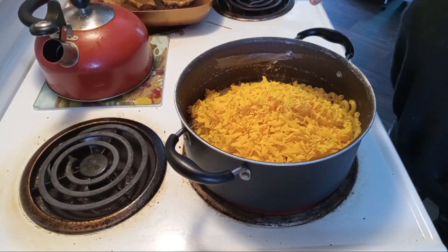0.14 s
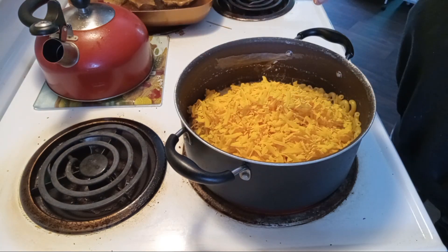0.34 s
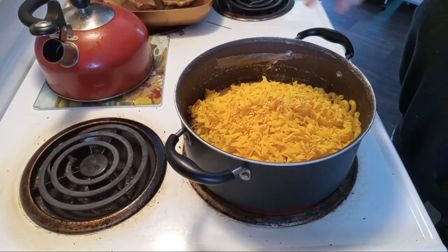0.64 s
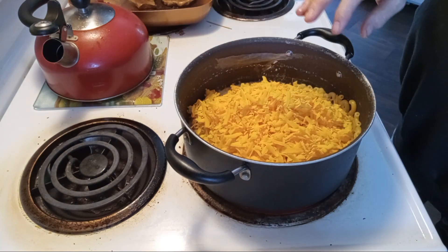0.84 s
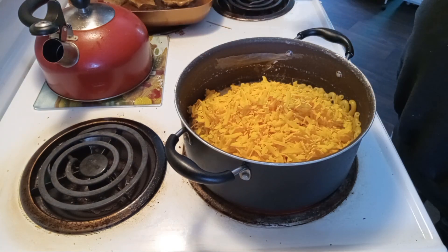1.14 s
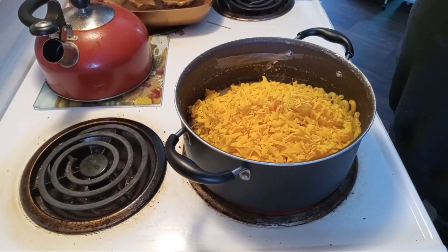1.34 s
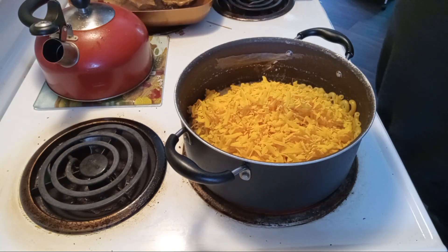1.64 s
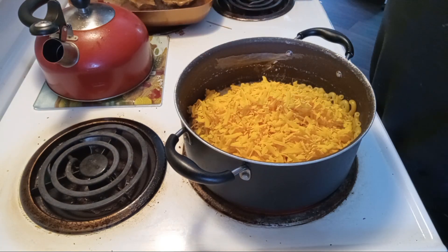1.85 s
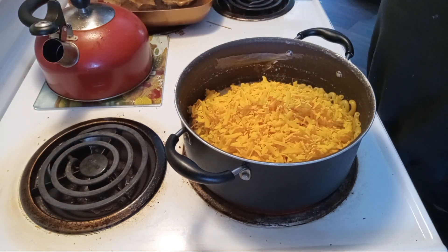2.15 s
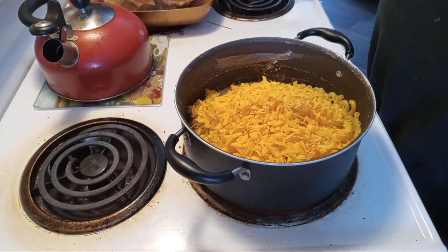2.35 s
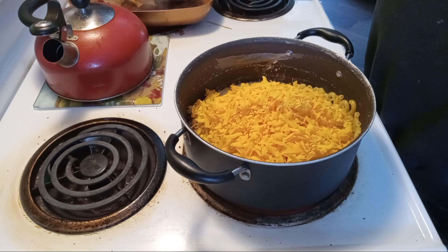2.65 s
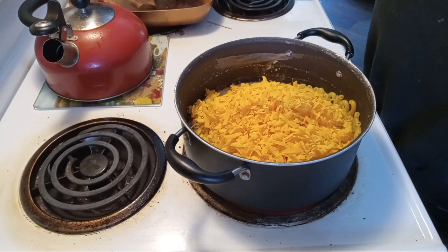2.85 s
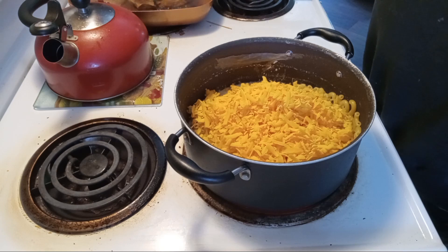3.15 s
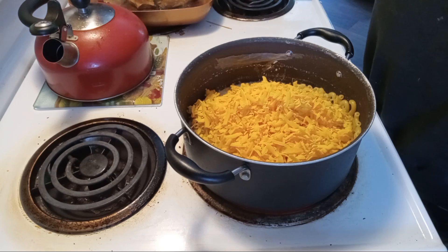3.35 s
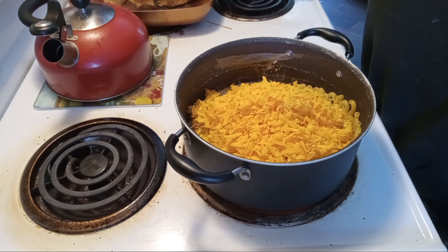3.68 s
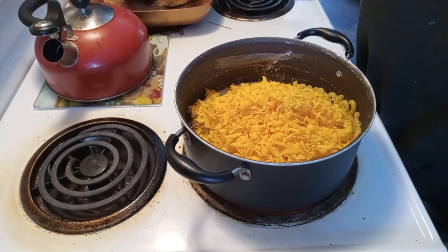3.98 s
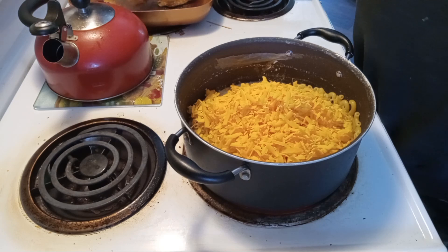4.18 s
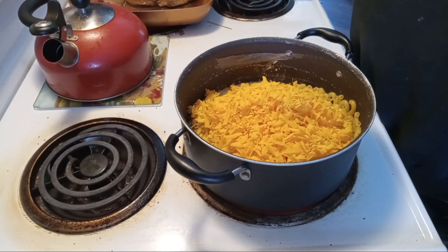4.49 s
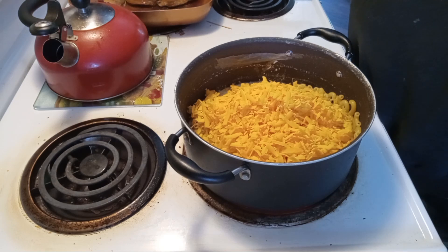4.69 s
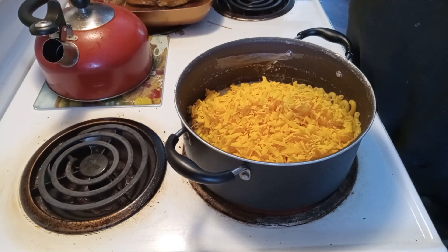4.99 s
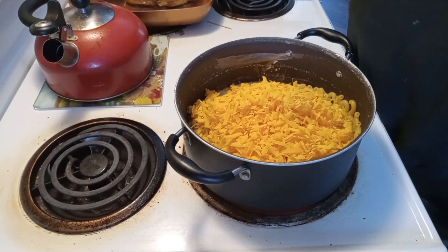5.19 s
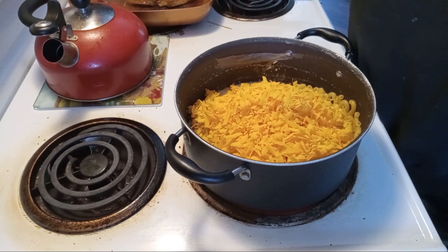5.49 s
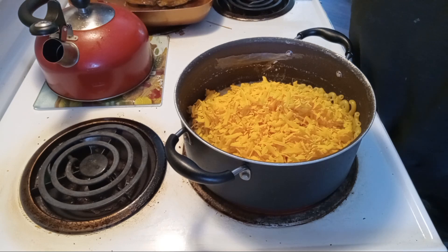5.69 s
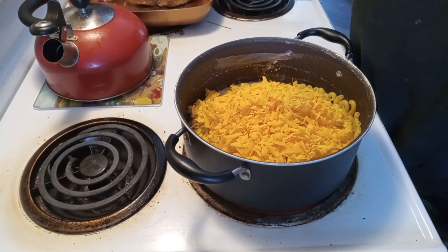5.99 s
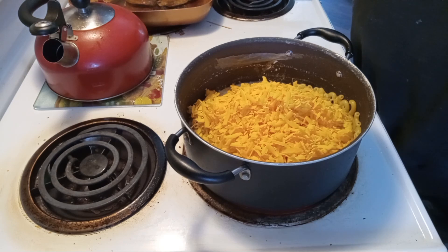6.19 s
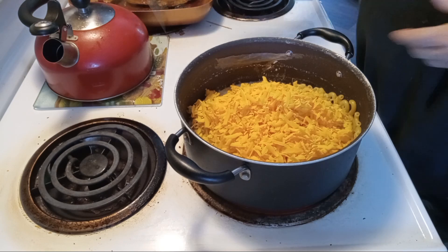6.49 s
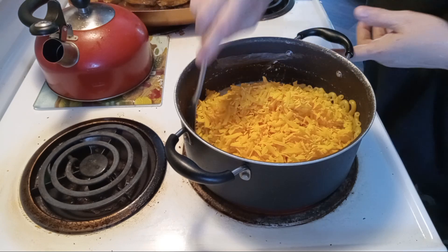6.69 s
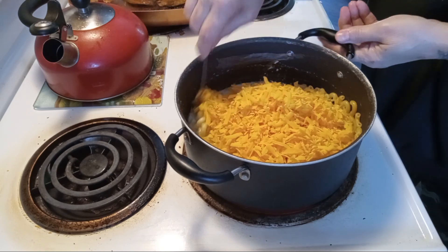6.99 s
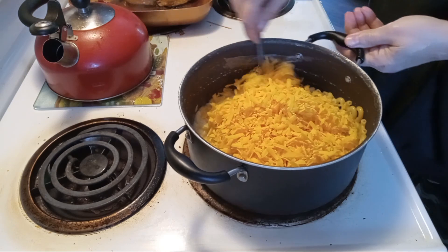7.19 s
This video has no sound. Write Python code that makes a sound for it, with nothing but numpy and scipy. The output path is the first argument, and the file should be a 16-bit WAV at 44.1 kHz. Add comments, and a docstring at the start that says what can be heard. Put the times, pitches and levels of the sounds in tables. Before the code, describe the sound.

Close steady pot sizzle with tiny steam chirps, an opening sharp dish knock, cutlery drawer clacks, soft footsteps, then a fork tapping and stirring.

```python
"""Noodles sizzling on an electric stove

In a quiet kitchen a pot boils off its last water on the hot base: random bubble bursts and steam noise grow finer.
Struck modes and room noise set down a dish; a duller knock follows. Noise bursts through resonances clack a drawer
open and shut. Swelling low modes make soft steps that return; a fork touches the pot and stirs.
One close microphone, the same in both channels, with a gain control that ducks the hiss under the knocks."""
import sys
import numpy as np
from scipy import signal
from scipy.fft import rfft, irfft
from scipy.io import wavfile
from scipy.ndimage import uniform_filter1d

SR = 44100
rng = np.random.default_rng(int(sys.argv[2]) if len(sys.argv) > 2 else 0)


def bounce(signal):
    """Save signal as a 16-bit WAV file at the path given by the first command-line argument."""
    frames = np.transpose(np.atleast_2d(signal))
    limited = np.clip(frames, -1, 1)
    pcm = np.round(limited * 32767).astype(np.int16)
    wavfile.write(sys.argv[1], SR, pcm)


N = 323436
TIME = np.arange(N) / SR  # s
FREQS = np.maximum(np.arange(N // 2 + 1) * SR / N, 1)  # Hz

# All levels are relative, ahead of the microphone's gain control.
# colour of the coarse fizz, before the pot's resonances: (frequency [Hz], density [dB per Hz])
FIZZ = [(400, -22.5), (1000, -12), (2200, -4), (2900, 3.5), (4100, 8), (6000, 5), (8500, -40), (9500, -29),
        (13500, -44), (15000, -31), (16000, -21)]
# colour of the fine hiss, before the pot's resonances: (frequency [Hz], density [dB per Hz])
HISS = [(1200, -24), (2200, -13.5), (3000, -22.5), (4100, -18), (4900, -4), (6100, 0), (7100, 0.5),
        (8600, -3), (9200, -11.5), (9800, -20), (11200, -27), (13900, -35.5), (14400, -22), (15400, -21.5)]
# resonances of the pot that colour the sizzle: (frequency [Hz], width [Hz], lift [dB])
POT = [(1600, 180, 3), (2420, 90, 3), (2740, 80, 3), (2950, 90, 3), (4630, 170, 3), (5055, 90, 3),
       (5674, 110, 3), (5968, 70, 3), (6257, 70, 3), (8356, 150, 3)]
# the pot's strongest resonances, sung as steam stirs them: (frequency [Hz], width [Hz], level [dB])
SINGING = [(4630, 90, -6), (5674, 70, -4), (5968, 40, 1), (6257, 40, -2)]
# spurts of steam flutter in these, strongest on the wet base: (frequency [Hz], width [Hz], level [dB])
SPURTS = [(3020, 70, -6), (4150, 70, -4), (4610, 100, 2.5), (5053, 70, -5), (6000, 120, -1)]
# the base boils dry along one S-curve: its midpoint and time constant (s)
DRYING_MID_S, DRYING_TAKES_S = 3.4, 0.84
# as it dries, the coarse fizz gives way to the fine hiss (dB)
FIZZ_WET_DB, FIZZ_DRY_DB = -46.5, -54
HISS_WET_DB, HISS_DRY_DB = -47, -42
# the clearest steam whistles: (time [s], level [dB], pitch [Hz])
WHISTLES = [(1.92, -50.5, 4163), (2.24, -52, 2935), (2.31, -52, 3020), (2.37, -51, 3050),
            (3.389, -56, 1608), (3.88, -54, 2200), (3.895, -54, 2650), (4.146, -58.5, 1266),
            (4.265, -52, 2680), (4.435, -52, 3520), (4.845, -52.5, 2950), (5.615, -55, 2410),
            (5.695, -54, 3030), (5.845, -55, 1810), (6.235, -56, 1920), (7.135, -54, 2190),
            (7.154, -55, 2730), (7.18, -53, 3000), (7.225, -54.5, 1800)]
# narrow gaps sing louder: gain of the highest faint whistle over the lowest (dB)
WHISTLE_RISE_DB = 11
# how unevenly a whistle sounds (dB)
WHISTLE_SPUTTER_DB = 3
# kitchen background: (frequency [Hz], density [dB per Hz])
ROOM = [(20, -11), (50, 4), (110, 0.5), (300, 1.5), (550, 0), (1000, 6.5), (1700, 1), (2500, -7),
        (5000, -4), (16000, -53)]
# feet shuffle and scuff: (time of peak [s], level [dB], length [s], pitch [Hz])
SHUFFLE = [(2.2, -72, 0.74, 128), (3.51, -64, 0.25, 124), (5.927, -57.5, 0.071, 760),
           (7.05, -72.5, 0.9, 116)]

# dish set down, with one rebound: (time [s], level [dB], contact cut-off [Hz], extra room level [dB])
KNOCKS = [(.078, -3, 7700, 6.5), (0.102, -14, 5900, 7)]
# the counter rings on under every knock: (frequency [Hz], level [dB], t60 [s])
COUNTER_RING = [(252.7, -30, 0.57), (280, -29, 0.5), (440.6, -35.5, 0.54), (740, -30, 0.51),
                (774, -32.5, 0.61), (825, -38, 0.61)]
# dead thud of dish and counter: (frequency [Hz], level [dB], t60 [s])
COUNTER = [(520, 10, 0.0039), (650, 10.5, 0.016), (925, -29, 0.013), (2000, -5, 0.0085),
           (3610, -6.5, 0.024), (6630, -2, 0.013)]
# ring of the dish: (frequency [Hz], level [dB], t60 before damping [s])
DISH = [(496, -14, .3), (577, -8, .27), (626, -6, .24), (676, -1, .22), (700, -8, .34), (931, 1.5, .42),
        (945, -7, .4), (1112, -7, .24), (1157, -9, .28), (1366, -12.5, .6), (1381, -19, .4),
        (1653, -13, .28), (1695, -2.5, .34), (1782, -5, .3), (1857, -9, .27), (2137, -4.5, .27),
        (2160, -12, .25), (2433, -20, .24), (2770, -18, .25), (2860, -19, .25), (2966, -21, .3),
        (3560, -19, .33), (3591, -17, .33), (3630, -19, .3), (3720, -17, .3), (3850, -20, .3),
        (3887, -17, .3)]
# colour of the room's answer to a knock: (frequency [Hz], density [dB per Hz])
KNOCK_ROOM = [(50, -31), (150, -6.5), (260, 3.5), (400, -3), (650, 1), (1000, -7.5), (1400, -6),
              (1800, 1.5), (2350, -13), (2800, -0.5), (3800, 9), (7000, 8), (10000, -13), (16000, -47)]
# how long that answer lasts: (frequency [Hz], t60 [s])
ROOM_T60 = [(100, 0.58), (270, 0.52), (600, 0.36), (1500, 0.47), (4000, 0.054), (12000, 0.041)]
# small sharp ticks: (time [s], level [dB], pitch [Hz])
TICKS = [(0.3522, -26, 3900), (0.3573, -17, 7500), (0.3797, -25, 6440)]
# a duller, hollow knock on the counter: (time [s], level [dB], t60 [s], contact cut-off [Hz])
HOLLOW_KNOCK = [(.4528, -20.5, 0.082, 2000), (0.484, -24.5, 0.22, 338), (0.496, -34, 0.16, 750)]
# what it rings with: (frequency [Hz], width [Hz], level [dB])
HOLLOW_MODES = [(143, 52, -9), (225, 13.6, -1.5), (300, 29, 1.5), (422, 32, -1), (480, 70, -3.5),
                (677, 60, 10), (844, 30, -2), (923, 25, 6), (1157, 26, 0.5), (1432, 28, -3),
                (1690, 34, 1.5), (1800, 26, 3)]
# how fast the rattle after a clack flutters
RATTLES_PER_S = 343
# loose cutlery clinks in the drawer and on the pot: (time [s], level [dB], pitch [Hz], t60 [s])
CLINKS = [(1.205, -54, 1336, .25), (2.185, -52, 1924, .18), (2.205, -46, 2600, .16),
          (2.212, -56, 1354, 0.42), (2.214, -56, 950, 0.2), (2.272, -54, 1364, 0.63),
          (2.298, -56, 1680, 0.22), (2.984, -26, 2360, 0.082), (3.061, -33, 1656, 0.075),
          (3.09, -52, 1200, 0.34), (3.135, -49.5, 2200, 0.21), (3.17, -52, 1620, 0.18),
          (3.186, -51, 1930, 0.2), (6.5384, -26.5, 4110, 0.055), (6.5385, -34.5, 2120, 0.059),
          (6.5765, -38, 4110, 0.085)]

# things slide in the drawer, swelling and fading: (time of peak [s], level [dB], length [s])
RUMMAGE = [(1.24, -53.5, 0.058), (1.468, -55, 0.035), (1.49, -50.5, 0.11), (2.228, -50.5, 0.066),
           (2.31, -58, 0.13), (3.85, -61.5, 1)]
# what those things ring with: (frequency [Hz], width [Hz], level [dB])
RUMMAGE_MODES = [(970, 590, -6), (1180, 38, 4), (1286, 25, 2.5), (1457, 17, -8), (1572, 27, 10),
                 (1826, 50, 7), (2240, 31, -7), (3020, 46, 6.5)]
# clacks of the drawer opening: (time [s], level [dB], t60 [s], contact cut-off [Hz])
OPENING = [(1.402, -25.5, 0.1, 12000), (1.413, -24, 0.14, 4170)]
# what the opening drawer rings with: (frequency [Hz], width [Hz], level [dB])
OPEN_MODES = [(410, 60, -19), (780, 16, -1), (923, 30, 1), (1140, 48, 1), (1445, 49, 7), (1620, 44, 8.5),
              (1990, 31, 13), (2144, 34, 11), (2350, 230, 6), (2720, 55, 9.5), (3000, 200, 1.5),
              (4270, 84, 8.5), (4720, 79, 7), (6000, 130, 6), (6550, 120, 9), (7970, 300, 3.5),
              (9900, 190, -5), (12000, 5000, -22)]
# the runner's squeak: (time of peak [s], level [dB], length [s])
SQUEAK = (1.513, -38.5, 0.029)
# notes of the squeak: (frequency [Hz], level [dB])
SQUEAK_NOTES = [(2170, 1), (3060, -2)]
# clacks of the drawer at its stop: (time [s], level [dB], t60 [s], contact cut-off [Hz])
END_STOP = [(1.5275, -25.5, 0.16, 9000), (1.552, -40, 0.095, 3000)]
# what the stopped drawer rings with: (frequency [Hz], width [Hz], level [dB])
STOP_MODES = [(405, 62, -21), (793, 17, 3.5), (1190, 55, 3), (1470, 140, 2.5), (1650, 91, 6), (2120, 60, 8),
              (2340, 110, 2), (2530, 140, -3), (2840, 60, 1), (3120, 260, -7), (4720, 270, -10),
              (5980, 90, -0.5), (6600, 660, -10)]
# clacks of the drawer pushed shut: (time [s], level [dB], t60 [s], contact cut-off [Hz])
SHUTTING = [(2.981, -25.5, 0.085, 10100), (2.9868, -29.5, 0.27, 5000)]
# what the shut drawer rings with: (frequency [Hz], width [Hz], level [dB])
SHUT_MODES = [(384, 30, 0), (630, 25, 5.5), (692, 34, -0.5), (930, 79, 5.5), (1250, 48, -7), (1595, 49, 7),
              (1920, 60, 7), (2280, 60, 8), (2415, 75, 10), (2744, 33, 12), (3000, 65, 2), (3260, 69, 8),
              (4500, 320, -1), (5980, 144, 6.5), (7500, 320, 7), (12000, 5000, -26)]
# clacks of its lurching contents: (time [s], level [dB], t60 [s], contact cut-off [Hz])
LURCH = [(3.0595, -34, 0.069, 4500), (3.066, -34.5, 0.1, 4500), (3.079, -41, 0.15, 2600),
         (3.097, -42, 0.08, 900)]
# what the contents ring with: (frequency [Hz], width [Hz], level [dB])
LURCH_MODES = [(632, 40, 1), (700, 45, 6), (1030, 110, -6), (1210, 44, -3), (1584, 70, 2.5), (2130, 80, 1),
               (2261, 50, 4), (2590, 45, 3), (2790, 80, -1), (3550, 300, -3), (6500, 1700, -4)]

# the drawer jolts the cabinet as it runs home: (time [s], level [dB])
JOLTS = [(2.984, -60), (3.036, -49)]
# boom of the cabinet: (frequency [Hz], level [dB], t60 [s])
CABINET = [(109.6, 0, 0.56), (163, -3.5, 0.73), (196, -4.5, 0.68), (278, -6.5, 0.64), (405, -17, 0.48)]
# heels land on the floor: (time [s], level [dB], pitch [Hz])
STEPS = [(3.089, -51, 85), (3.175, -44, 90.8), (5.936, -55, 101.2), (6.941, -58, 108)]
STEP_T60_S = 0.48
# soft hollow bumps at the stove: (time [s], level [dB])
BUMPS = [(5.425, -63), (5.893, -61.5), (6.649, -60), (6.856, -55.5), (6.96, -59.5)]
BUMP_HZ, BUMP_T60_S = 319, 0.3
# every thump builds up (s) into a clean mode and a rumble around it (gains)
THUMP_SWELL_S, THUMP_BOOM, THUMP_RUMBLE = 0.17, 2.2, 1.56
# the fork touches the pot: (time [s], level [dB], t60 [s], contact cut-off [Hz])
FORK_TOUCH = [(6.5415, -36, 0.05, 12000), (6.547, -33.5, 0.1, 6000)]
# the fork turns the noodles over: (time of peak [s], level [dB], length [s])
STIRRING = [(7.15, -58, 0.74)]
# what the fork rings with: (frequency [Hz], width [Hz], level [dB])
FORK_MODES = [(327, 7.3, -5.5), (720, 150, -10), (1110, 260, -6.5), (1563, 43, 4), (2120, 79, 0.5),
              (2700, 120, -6), (4100, 240, 0.5), (4750, 500, -10)]
# top of the recorded band
CUTOFF_HZ = 15800


def from_db(db):
    """Decibels to gain."""
    return 10 ** (np.asarray(db) / 20)


def rms_one(x):
    """Scale to rms 1."""
    return x / np.sqrt(np.mean(x ** 2) + 1e-20)


def at_hz(points, hz):
    """Read a table on a log-frequency axis."""
    f, value = np.transpose(points)
    return np.interp(np.log(hz), np.log(f), value)


def coloured(x, gain_db):
    """Give a steady sound a spectrum; rms 1."""
    return rms_one(irfft(rfft(x) * from_db(gain_db), N))


def drift(rate_hz):
    """Slow random wander of rms 1: noise through two equal low-pass poles, drawn every 40 samples."""
    r = np.exp(-80 * np.pi * rate_hz / SR)
    noise = rng.standard_normal(N // 40 + 2002)
    slow = signal.lfilter([1], [1, -2 * r, r * r], noise)[2000:]  # drop the filter's start
    return np.interp(np.arange(N) / 40, np.arange(len(slow)), rms_one(slow))


def dying(t60):
    """One second of exponential decay, 60 dB down after t60 seconds."""
    return np.exp(-np.log(1000) * TIME[:SR] / t60)


def soften(x, hz):
    """A soft contact loses its treble."""
    low_pass = signal.butter(2, min(hz, SR * 4 / 9), fs=SR, output="sos")
    return signal.sosfilt(low_pass, x + 1e-18)


def resonate(x, modes):
    """Parallel resonances (Hz, width, dB) that keep the power of white noise."""
    out, power = 0, 0
    for k, (hz, width, db) in enumerate(modes):
        r = np.exp(-np.pi * width / SR)
        gain = (-1) ** k * from_db(db) * (1 - r * r) / 2
        poles = [1, -2 * r * np.cos(2 * np.pi * hz / SR), r * r]
        out = out + signal.lfilter([gain, 0, -gain], poles, x + 1e-18)
        power += from_db(db) ** 2 * (1 - r * r) / 2
    return out / np.sqrt(power)


def struck(modes, damping=1):
    """Dying sines (Hz, dB, t60) set off by one blow; damping shortens them."""
    out = 0
    for k, (hz, db, t60) in enumerate(modes):
        sine = np.sin(2 * np.pi * hz * TIME[:SR])
        out = out + (-1) ** k * from_db(db) * sine * dying(t60 / damping)
    return out


def stroke(peak_s, db, length_s):
    """Gain of a sliding movement: it swells to its peak and fades as fast."""
    return from_db(db) * np.exp(-2 * np.abs(TIME - peak_s) / length_s)


def add(out, s, sound):
    """Mix a sound in at time s."""
    start = max(round(s * SR), 0)
    out[start:start + len(sound)] += sound[:N - start]


def sizzle(spectrum, per_s, steam, flutter_db):
    """Tiny bubbles burst at random over smooth steam noise, coloured by the pot."""
    bursts = (rng.random(N) < per_s / SR) * rng.standard_normal(N)
    source = rms_one(bursts) + steam * rng.standard_normal(N)
    pot_db = sum(db / (1 + (2 * (FREQS - hz) / width) ** 2) for hz, width, db in POT)
    flutter = from_db(flutter_db * drift(7.4))
    return coloured(source, at_hz(spectrum, FREQS) + pot_db) * flutter


def singing(modes, waver_db, rate_hz):
    """Each resonance, stirred by noise, swells and fades on its own."""
    out = 0
    for hz, width, db in modes:
        swell = from_db(waver_db * np.minimum(drift(rate_hz), 2))
        note = resonate(rng.standard_normal(N), [(hz, width, 0)])
        out = out + from_db(db) * rms_one(swell * note)
    return out


def chirp(hz, length_s, bend, flutter):
    """A short sputtering whistle that swells, glides and fades."""
    age = np.linspace(0, 1, int(length_s * SR))
    knots = np.linspace(0, 1, num=12)
    wobble, sputter = [np.interp(age, knots, row) for row in rng.standard_normal((2, 12))]
    pitch = hz * (1 + bend * (age - .5) + flutter * wobble)
    tone = np.sin(2 * np.pi * np.cumsum(pitch) / SR)
    return tone * np.sin(np.pi * age) * from_db(WHISTLE_SPUTTER_DB * sputter)


def steam_whistles(level_db, spread_db, length_s, glide, flutter, count):
    """Steam squeezing between the noodles sings: a few clear, mostly rising chirps among many faint ones."""
    out = np.zeros(N)
    for s, db, hz in WHISTLES:
        add(out, s, from_db(db) * chirp(hz, length_s, glide * rng.uniform(-0.44, 1), flutter))
    for start, height, length, bend, size in rng.random((count, 5)):
        hz = 800 + 3400 * height
        faint = chirp(hz, length_s * (.5 + length), glide * (2 * bend - 1), flutter)
        faint_db = level_db + spread_db * size + WHISTLE_RISE_DB * height
        add(out, start * N / SR, from_db(faint_db) * faint)
    return out


def kitchen_floor(air_db, shuffle_width, uneven_db):
    """Quiet room air as coloured noise, and the low rustle of feet as narrow, uneven noise."""
    air = from_db(air_db) * coloured(rng.standard_normal(N), at_hz(ROOM, FREQS))
    feet = 0
    for s, db, length_s, hz in SHUFFLE:
        band = resonate(rng.standard_normal(N), [(hz, hz * shuffle_width, 0)])
        rustle = soften(band, hz * 4.8)
        feet = feet + stroke(s, db, length_s) * rms_one(rustle)
    return air + feet * from_db(uneven_db * drift(16.0))


def room_tail():
    """Dense reflections of one knock; each octave of noise dies at its own rate, and the lows last longest."""
    wash = rfft(coloured(rng.standard_normal(N), at_hz(KNOCK_ROOM, FREQS))[:SR])
    bin_hz = np.maximum(np.arange(len(wash)), 64)  # one second of sound: bins 1 Hz apart
    octave = np.round(np.log2(bin_hz)).astype(int)
    tail = 0
    for k in np.unique(octave):
        tail = tail + irfft(wash * (octave == k), SR) * dying(at_hz(ROOM_T60, 2. ** k))
    return tail * (1 - dying(0.0094))


def dish(thud_db, ring_db, room_db, damping, seated_s, seated_t60, rocking_db):
    """Each knock is a short thud with the room's answer; the dish rocks, each mode wavering, until it sits flat."""
    out = np.zeros(N)
    ring = sum(struck([mode], damping) * from_db(rocking_db * drift(22)[:SR]) for mode in DISH)
    add(out, KNOCKS[0][0], from_db(ring_db) * ring)
    out *= np.exp(-np.log(1000) * np.maximum(TIME - seated_s, 0) / seated_t60)  # seating damps it
    for s, db, contact_hz, wet_db in KNOCKS:
        thud = from_db(thud_db) * (struck(COUNTER) + struck(COUNTER_RING))
        blow = thud + from_db(room_db + wet_db) * room_tail()
        add(out, s, from_db(db) * soften(blow, contact_hz))
    return out


def ticks(t60, crack, swell_s):
    """Light little contacts: a small crack with one brief high mode, no bass and no top treble."""
    out = np.zeros(N)
    for s, db, hz in TICKS:
        snap = crack * rng.standard_normal(SR) * dying(t60)
        add(out, s, from_db(db) * (struck([(hz, 0, t60)]) + snap) * (1 - dying(swell_s)))
    band_pass = signal.butter(6, [1000, 8800], "band", fs=SR, output="sos")
    return signal.sosfilt(band_pass, out + 1e-18)


def clacks(hits, modes, direct, rough_db):
    """A blow and its dying shower of rattles and reflections pass through the object's resonances."""
    out = np.zeros(N)
    for s, db, t60, contact_hz in hits:
        steps = np.clip(rng.standard_normal(SR), -2, 2)
        rattle = np.interp(TIME[:SR] * RATTLES_PER_S, np.arange(SR), steps)
        shower = rng.standard_normal(SR) * rms_one(from_db(rough_db * rattle)) * dying(t60)
        shower[0] = direct  # the blow itself
        add(out, s, from_db(db) * soften(shower, contact_hz))
    return resonate(out, modes)


def hollow_knock(direct, rough_db, counter_db, counter_hz):
    """A dull knock that leaves the counter's low modes humming."""
    out = clacks(HOLLOW_KNOCK, HOLLOW_MODES, direct, rough_db)
    hum = soften(struck(COUNTER_RING), counter_hz)
    add(out, HOLLOW_KNOCK[0][0], from_db(counter_db) * hum)
    return out


def clinks(swell_s, waver):
    """Loose cutlery touches and rings briefly on one unsteady note."""
    out = np.zeros(N)
    for s, db, hz, t60 in CLINKS:
        blur = rms_one(resonate(rng.standard_normal(SR), [(hz, 60, 0)]))
        note = struck([(hz, 0, t60)]) + waver * blur * dying(t60)
        add(out, s, from_db(db) * note * (1 - dying(swell_s)))
    return out


def rummage(strokes, modes, judder_db):
    """Sliding contact judders and sets the rubbed things ringing."""
    movement = sum(stroke(*row) for row in strokes)
    friction = rng.standard_normal(N) * movement * from_db(judder_db * drift(32))
    return resonate(friction, modes)


def squeak(width_hz):
    """The drawer's runner squeaks in narrow bands of noise just before it meets its stop."""
    modes = [(hz, width_hz, db) for hz, db in SQUEAK_NOTES]
    return stroke(*SQUEAK) * rms_one(resonate(rng.standard_normal(N), modes))


def kitchen_echo(x, delay_s, t60, top_hz):
    """The far walls answer a clack a moment later, dull and diffuse."""
    tail = soften(rng.standard_normal(SR), top_hz) * dying(t60) * (1 - dying(0.021))
    answer = np.zeros(N)
    add(answer, delay_s, tail / np.sqrt(np.sum(tail ** 2)))
    return signal.fftconvolve(x, answer[:SR])[:N]


def drawer():
    """The drawer snaps free, squeaks out to its stop, is searched and pushed shut; its contents lurch after it."""
    blows = clacks(OPENING, OPEN_MODES, direct=5.7, rough_db=0.5)
    blows += clacks(END_STOP, STOP_MODES, direct=7.8, rough_db=-1.5)
    blows += clacks(SHUTTING, SHUT_MODES, direct=6.7, rough_db=3.5)
    blows += clacks(LURCH, LURCH_MODES, direct=1, rough_db=2.5)
    echo = kitchen_echo(blows, delay_s=0.012, t60=0.16, top_hz=590)
    sliding = rummage(RUMMAGE, RUMMAGE_MODES, judder_db=1.0)
    return blows + from_db(-12.5) * echo + sliding + squeak(width_hz=10)


def thump(hz, t60):
    """A heavy panel swells into one low mode, with a rumble around it."""
    band = resonate(rng.standard_normal(SR), [(hz, hz * 0.37, 0)])
    rumble = rms_one(soften(band, hz * 1.75))
    body = THUMP_BOOM * struck([(hz, 0, t60)]) + THUMP_RUMBLE * rumble * dying(t60)
    return body * (1 - dying(THUMP_SWELL_S))


def thumps():
    """The cabinet's boom, steps on the floor and bumps at the stove, all as low swelling modes."""
    out = np.zeros(N)
    for s, db in JOLTS:
        add(out, s, sum(from_db(db + mode_db) * thump(hz, t60) for hz, mode_db, t60 in CABINET))
    for s, db, hz in STEPS:
        add(out, s, from_db(db) * thump(hz, STEP_T60_S))
    for s, db in BUMPS:
        add(out, s, from_db(db) * thump(BUMP_HZ, BUMP_T60_S))
    return out


def fork():
    """The fork clacks against the pot, then its sliding contact stirs the noodles."""
    touch = clacks(FORK_TOUCH, FORK_MODES, direct=6.4, rough_db=3)
    return touch + rummage(STIRRING, FORK_MODES, judder_db=-2.5)


def scene():
    """Pot, dish, drawer, steps and fork over the quiet kitchen, the same in both channels."""
    dryness = 1 / (1 + np.exp((DRYING_MID_S - TIME) / DRYING_TAKES_S))
    fizz_db = FIZZ_WET_DB + (FIZZ_DRY_DB - FIZZ_WET_DB) * dryness
    hiss_db = HISS_WET_DB + (HISS_DRY_DB - HISS_WET_DB) * dryness
    fizz = from_db(fizz_db) * sizzle(FIZZ, per_s=5000, steam=1.0, flutter_db=1.5)
    fizz += from_db(fizz_db - 12) * singing(SPURTS, waver_db=5, rate_hz=14)
    hiss = from_db(hiss_db) * sizzle(HISS, per_s=9000, steam=0.99, flutter_db=1.26)
    hiss += from_db(hiss_db - 9) * singing(SINGING, waver_db=5.0, rate_hz=6.9)
    chirps = steam_whistles(level_db=-72, spread_db=8, length_s=0.058, glide=0.045, flutter=0.008, count=460)
    air_and_feet = kitchen_floor(air_db=-64.0, shuffle_width=0.18, uneven_db=4.0)
    counter = dish(thud_db=0.5, ring_db=-19.5, room_db=-14.5, damping=1.1,
                   seated_s=0.21, seated_t60=0.11, rocking_db=2.5)
    counter += hollow_knock(direct=22, rough_db=-1.0, counter_db=-20.5, counter_hz=400)
    small = ticks(t60=0.011, crack=0.33, swell_s=0.0038) + clinks(swell_s=0.013, waver=0.53)
    pot = fizz + hiss + chirps
    mono = pot + air_and_feet + counter + small + drawer() + thumps() + fork()
    return np.array([mono, mono])


def gain_control(x, threshold_db, slope, release_db_per_s, ahead_s):
    """Loud moments pull the gain down slightly in advance; it then recovers steadily."""
    power = uniform_filter1d(x[0] ** 2, size=256)
    level_db = 10 * np.log10(np.maximum(power, 1e-12))
    cut_db = slope * np.maximum(level_db - threshold_db, 0)
    recovery_db = release_db_per_s * TIME
    held_db = np.maximum.accumulate(cut_db + recovery_db) - recovery_db
    early_db = np.maximum(held_db, np.interp(TIME + ahead_s, TIME, held_db))
    return x * from_db(-uniform_filter1d(early_db, size=200))


def record(dry):
    """Bass roll-off of a small microphone, gain control, then a steep top cut."""
    bass_cut = signal.butter(2, 55, "high", fs=SR, output="sos")
    thin = signal.sosfilt(bass_cut, dry)
    held = gain_control(thin, threshold_db=-29.5, slope=0.53, release_db_per_s=140, ahead_s=0.0006)
    top_cut = signal.ellip(12, .1, 70, CUTOFF_HZ, fs=SR, output="sos")
    return signal.sosfilt(top_cut, held)


dry = scene()
out = record(dry)
bounce(out)
```